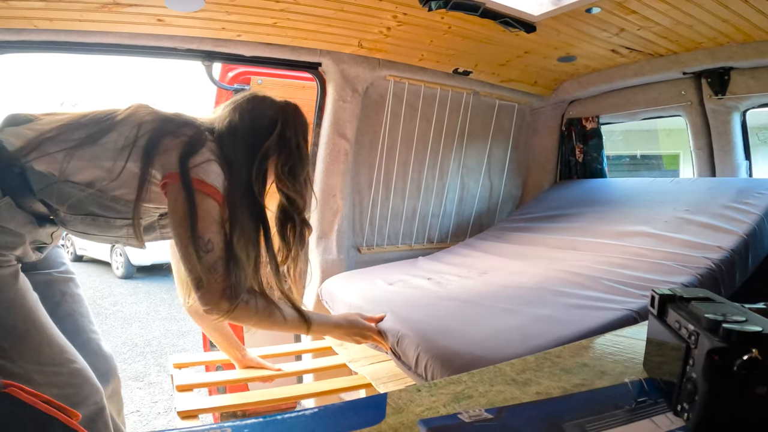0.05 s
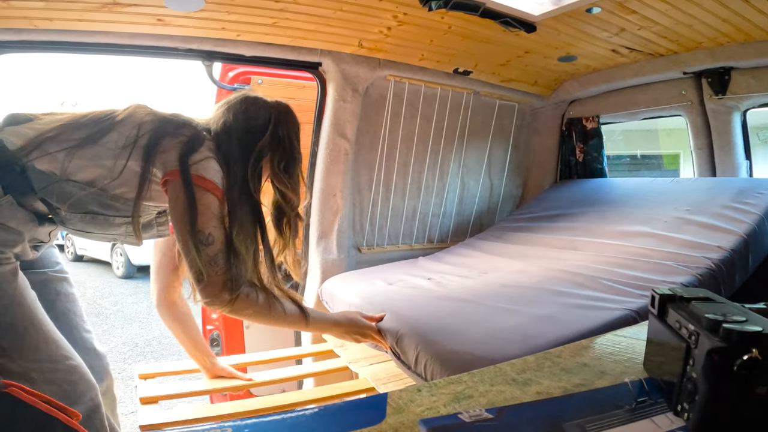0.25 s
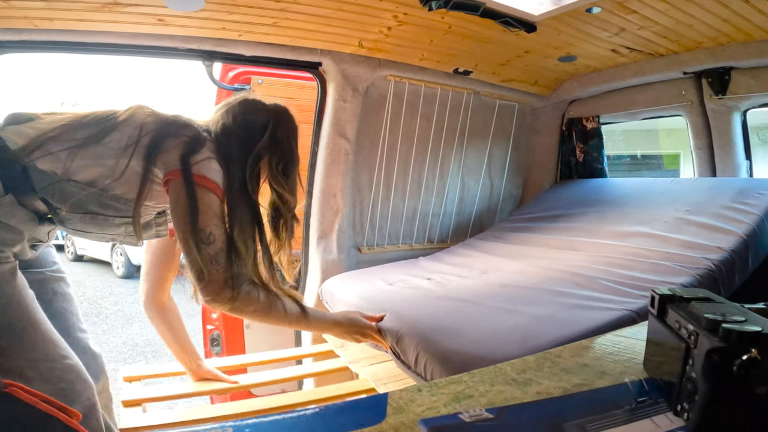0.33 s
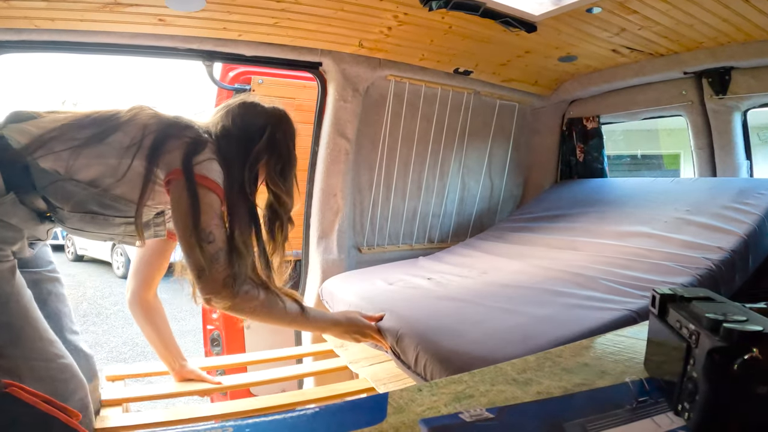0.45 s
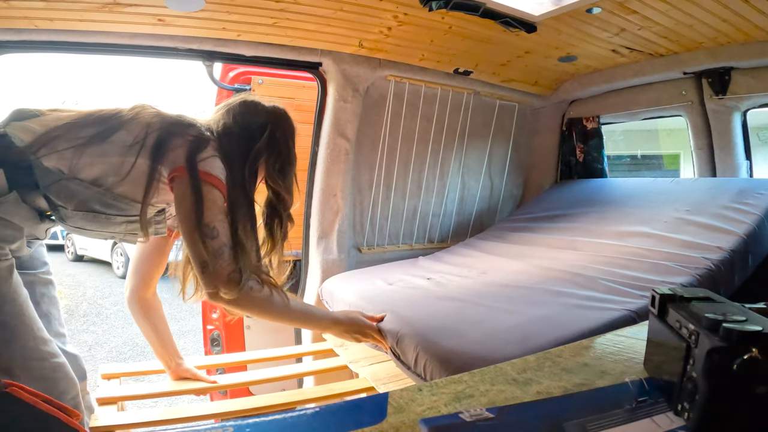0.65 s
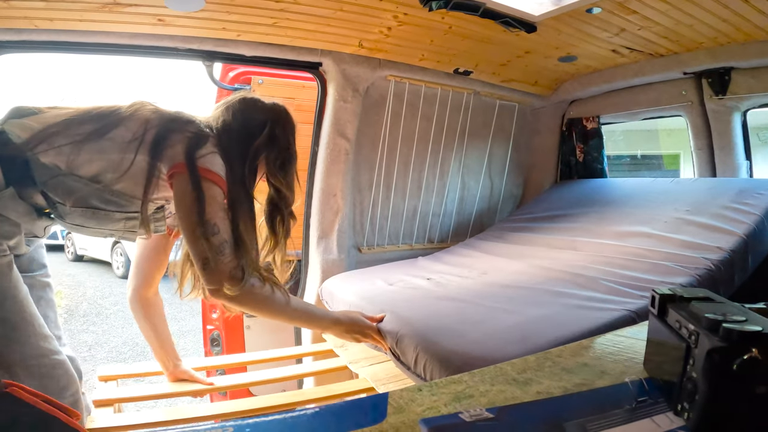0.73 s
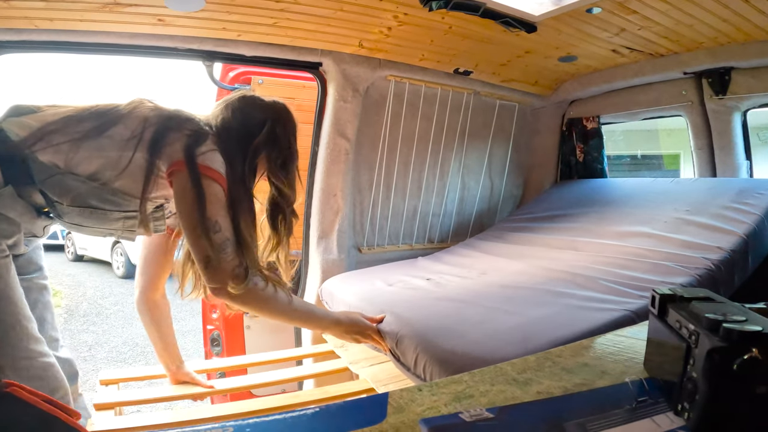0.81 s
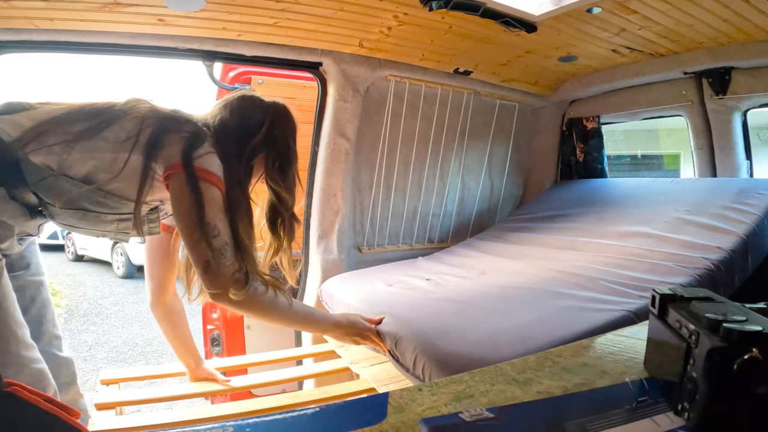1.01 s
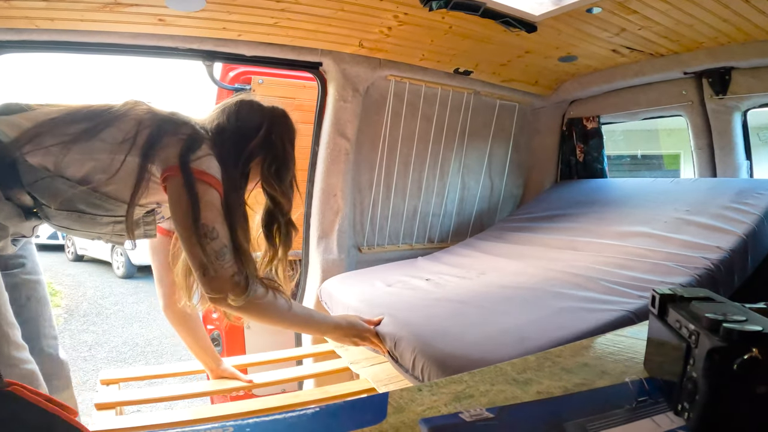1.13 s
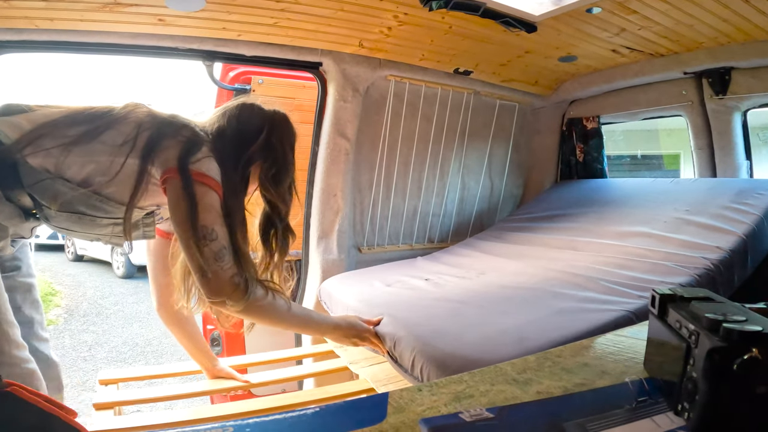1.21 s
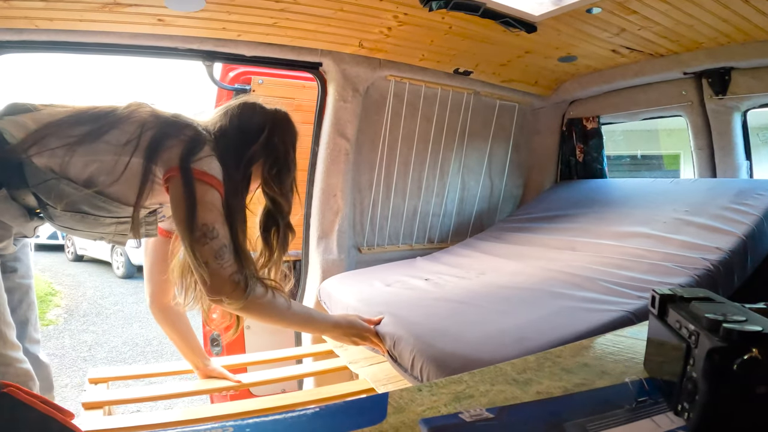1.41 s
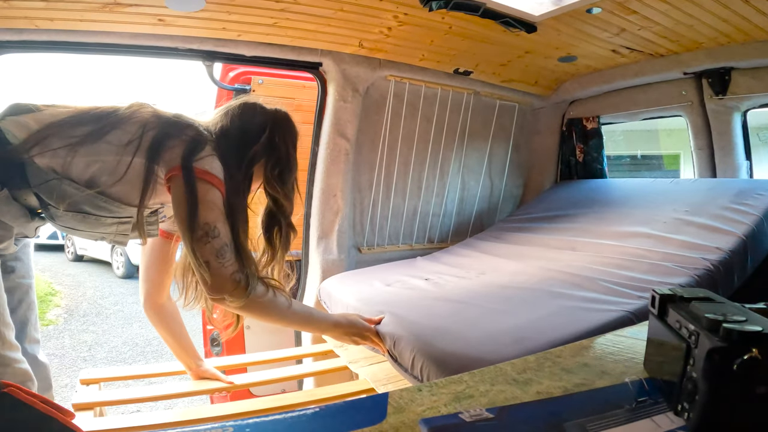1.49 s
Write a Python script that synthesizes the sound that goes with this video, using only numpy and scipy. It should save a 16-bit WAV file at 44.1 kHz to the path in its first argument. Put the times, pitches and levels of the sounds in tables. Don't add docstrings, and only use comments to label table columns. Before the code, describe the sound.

Wooden slats scrape and rumble over a frame, with a hard knock and later soft thud

```python
import sys
import numpy as np
from scipy import signal
from scipy.fft import rfft, irfft, next_fast_len
from scipy.io import wavfile
from scipy.ndimage import uniform_filter1d

SR = 44100
rng = np.random.default_rng(int(sys.argv[2]) if len(sys.argv) > 2 else 0)


def ratio(d):
    e = np.asarray(d, float) / 20
    return 10 ** e


def store_wav(level_fs):
    pcm = np.round(np.clip(np.atleast_2d(level_fs), -1, 1) * 32767)
    wavfile.write(sys.argv[1], SR, pcm.T.astype(np.int16))


N = 68355
FIBRES_PER_S = 5000


def evened(x):
    return x / np.sqrt(np.mean(x ** 2) + 1e-20)


def read(points, hz):
    f, value = np.transpose(points)
    return np.interp(np.log(hz + 1), np.log(f + 1), value)


def add(mix, s, sound):
    part = mix[round(s * SR):][:len(sound)]
    part += sound[:len(part)]


def stroke(t, rise, fall, db):
    return ratio(db - 20 * np.maximum(t - rise, 0) / fall) * np.clip(t / rise, 0, 1)


def colour(x, points, patchy_db):
    hz, _, z = signal.stft(x, SR, nperseg=512, noverlap=384)
    patches = uniform_filter1d(rng.standard_normal(z.shape), size=4, axis=0)
    patches = evened(uniform_filter1d(patches, size=10, axis=1))
    z = z * ratio(read(points, hz)[:, None] + patchy_db * patches)
    return evened(signal.istft(z, SR, nperseg=512, noverlap=384)[1][:N])


def grit(rate, spread_db):
    happens = rng.random(N) < rate / SR
    size = ratio(spread_db * np.minimum(rng.exponential(1, N), 4))
    return evened(happens * rng.choice([-1., 1.], N) * size)


def ring(modes, detune=1):
    t = np.arange(SR // 3) / SR
    out = 0
    for k, (hz, db, t60) in enumerate(modes):
        out = out + (-1) ** k * ratio(db - 60 * t / t60) * np.sin(2 * np.pi * hz * detune * t)
    return out


# [f/Hz, level/dB per Hz]
FLOOR_SPECTRUM = [(30, -36), (60, -22), (90, -1), (200, -1), (520, -18.5), (1030, -14.5), (4000, -30),
                  (14000, -51)]


def outdoor_floor():
    return ratio(-52) * colour(rng.standard_normal(N), FLOOR_SPECTRUM, patchy_db=3.0)


# [start t/s, rise t/s, fall t/s, level/dB, f/Hz]
SWAYS = [
    (.46, .11, 0.071, -50.5, 52),
    (.24, .04, .05, -47, 57),
    (1.02, .03, 0.047, -47, 60),
    (0.67, 0.023, 0.047, -44.5, 90),
]


def sway():
    out = 0
    for s, rise, fall, db, hz in SWAYS:
        t = np.arange(N) / SR - s
        wobble = 1.5 * np.sin(2 * np.pi * 6.1 * t)
        out = out + stroke(t, rise, fall, db) * np.sin(2 * np.pi * hz * t + wobble)
    return out


# [f/Hz, t60/s]
CABIN_DECAY = [(100, 0.35), (500, 0.23), (3000, 0.12), (10000, 0.11)]


def cabin(x):
    taps = np.zeros(SR // 2)
    at = np.arange(120, len(taps) - 22, 22)
    taps[at + rng.integers(0, 22, len(at))] = rng.choice([-1., 1.], len(at))
    hz, t, z = signal.stft(taps, SR, nperseg=512)
    decay = ratio(-60 * t / read(CABIN_DECAY, hz)[:, None])
    tail = signal.istft(z * decay, SR, nperseg=512)[1]
    return signal.fftconvolve(x, tail / np.linalg.norm(tail))[:N]


# [start t/s, rise t/s, fall t/s, level/dB, weight on the slats level/dB]
SCUFF_STROKES = [
    (0.709, 0.12, 0.079, -42.5, -5.5),
    (0.851, 0.032, 0.17, -53, 11),
    (1.034, 0.038, 0.095, -44.5, -11),
    (1.097, 0.02, 0.11, -39, -11),
    (1.132, 0.027, 0.046, -46.5, -30),
    (1.19, 0.051, 0.38, -60, -22),
    (1.267, 0.075, 0.29, -52.5, -9),
    (.001, 0.0025, 0.42, -52.5, -13),
]
# [f/Hz, level/dB per Hz]
CLOTH_SPECTRUM = [(400, -25), (800, -20.5), (1340, -8.5), (2000, -7.5), (2350, -5.5), (3430, -2),
                  (8000, -19), (14000, -35.5)]


def scuffs():
    env, load, t = np.zeros(N), np.zeros(N), np.arange(SR // 2) / SR
    for s, rise, fall, db, weight_db in SCUFF_STROKES:
        brush = stroke(t, rise, fall, db) * np.minimum(t / rise, 1)
        add(env, s, brush)
        add(load, s, brush * ratio(weight_db))
    fibres = grit(FIBRES_PER_S, spread_db=-10.5) + 1.05 * rng.standard_normal(N)
    return env * colour(fibres, CLOTH_SPECTRUM, patchy_db=1.0) + rumble(load)


# [start t/s, rise t/s, fall t/s, level/dB, pitch factor]
HARD_PRESSES = [
    (1.102, 0.008, 0.09, -39, 1.0),
    (1.05, .022, 0.066, -46, 1.12),
    (0.241, 0.0074, 0.09, -34, .93),
    (1.136, 0.0056, .07, -47, 1.15),
]
# [f/Hz, level/dB, t60/s]
VARNISH_MODES = [(2392, -3, .02), (2730, -4, .02), (3010, -0.5, 0.017), (3486, -1, .018),
                 (3840, -2.5, 0.013), (4100, -2.5, 0.014), (4570, -3, .015), (5150, -6, .012)]


def presses():
    out, t = np.zeros(N), np.arange(SR // 4) / SR
    grains = grit(FIBRES_PER_S, spread_db=2.8)
    for s, rise, fall, db, pitch in HARD_PRESSES:
        sing = evened(signal.fftconvolve(grains, ring(VARNISH_MODES, pitch))[:N])
        sing = sing[round(s * SR):][:len(t)]
        add(out, s, sing * stroke(t, rise, fall, db) * np.minimum(t / rise, 1))
    return out


# [t/s, level/dB, length/ms, direction of motion]
PUSHES = [(.3785, -15.5, 3.1, -1), (.383, -11.5, 4.4, -1), (0.48, -17, 3.1, -1), (.4325, -21, 4, -1),
          (0.32, -22.5, 4, -1), (.5605, -23, 4.3, 1), (.2025, -26, 3.9, -1), (.2895, -20, 3.7, -1),
          (.900, -19, 3.1, -1), (.9045, -15, 3, 1), (.9065, -17, 3, -1), (0.37, -33, 4.4, 1)]


def jolts():
    out = np.zeros(N)
    for s, db, length_ms, direction in PUSHES:
        add(out, s, direction * ratio(db) * np.hanning(round(length_ms * SR / 1000)))
    return out


# [t/s, level/dB, pitch factor]
TIP_TOUCHES = [(.633, -40, .9), (.669, -42, .95), (.899, -31, 1.002), (.4125, -25, 1.075),
               (.463, -26, 0.99), (.362, -18, 0.93), (0.48, -39.5, .55), (.60, -41.5, .58),
               (0.91, -40.5, .72), (.862, -37, .68), (1.2, -39, 0.52), (1.505, -39, .58), (.775, -41, .45),
               (.535, -35.5, .5), (1.0, -42, .62), (1.072, -40, .72), (1.104, -39, .75), (1.12, -41, .62)]
# [f/Hz, level/dB, t60/s]
TIP_MODES = [(476, 1.5, 0.022), (634, 3, 0.0234), (910, -4, 0.017), (1298, -8, 0.035)]


def ticks():
    out = np.zeros(N)
    for s, db, pitch in TIP_TOUCHES:
        add(out, s, ratio(db) * np.convolve(ring(TIP_MODES, pitch), np.hanning(30) / 15))
    return out


# t/s, level/dB, swell t/s, free t/s, damping level/dB, t60 at rest/s
FRAME_DROP = (.3385, -10, .003, .029, -16, .22)
SEAT_THUD = (.9048, -14.5, .004, .0195, -10, .2)
# [f/Hz, level/dB, t60/s]
FRAME_MODES = [(141, -3.5, 1.), (93, -24, .25), (280, -2, .5), (200, -5, .6), (560, -14, .3),
               (690, -11, .05), (1165, -17, .09), (760, -15, .05), (625, -14, .12)]
# [f/Hz, level/dB, t60/s]
SEAT_MODES = [(153, 1, .8), (95, -13, .6), (335, -3, .06), (227, -14, .19), (580, -14, .04),
              (865, -24, .04), (1250, -16, .012)]


def settle(modes, s, db, swell, free, damping_db, rest):
    t, out = np.arange(SR // 3) / SR, np.zeros(N)
    pressed = np.clip((t - free) / .005, 0, 1)
    held_db = damping_db * pressed - 60 * np.maximum(t - free, 0) / rest
    add(out, s, ring(modes) * (1 - np.exp(-t / swell)) * ratio(db + held_db))
    return out


# [t/s, level/dB, contact time/ms, share of the seat box 0-1]
BLOWS = [(.340, -23, 0.31, 0.2), (0.348, -25, 0.55, 0.03), (0.364, -24.5, 0.62, 0.4), (0.377, -24, 1.24, 0),
         (.405, -19.5, 1.08, 0.62), (0.433, -28.5, 0.55, 0.3), (0.455, -35, 1.15, 0.7),
         (0.462, -27, 0.57, 0.2), (0.482, -45, 0.79, 0.3), (.563, -33, 1.67, 0.57), (0.585, -29, 3.1, 0.55),
         (.618, -30, 2.57, 0.6), (0.863, -33.5, 0.4, 0.6), (0.393, -30, 1.2, 0.04),
         (0.900, -29.5, 0.94, 0.56), (0.972, -29, 2, 0.78), (1.043, -23.5, 4.2, .9), (1.076, -36, 0.6, 0.4),
         (1.106, -35, 1.15, 0.48), (1.092, -41.5, 0.52, 0.46), (1.196, -36, 2.2, 0.4),
         (0.16, -26.5, 1.4, 0.26), (0.183, -30.5, 0.74, 0), (0.2, -25.5, 3.7, 0), (0.231, -27, 1.6, 0.24),
         (0.276, -25, 1.1, 0.13), (1.524, -35, 1.43, 0.05), (1.535, -36, 1.3, 0.46), (.871, -29, 1.56, 0.7),
         (.002, -36.5, 2.37, 0.98)]
# [f/Hz, level/dB, t60/s]
BOX_MODES = [(93.8, -12, 0.33), (149, -4, 0.078), (213.4, 6, 0.066), (358, 7, 0.037), (520, -26, 0.017)]


def knocks():
    crack_db, crack_t60 = -17.5, 0.075
    out, crack_env, t = np.zeros(N), np.zeros(N), np.arange(SR // 4) / SR
    detunes = rng.uniform(0.917, 1.075, (len(BLOWS), 2))
    for (s, db, contact_ms, share), detune in zip(BLOWS, detunes):
        body = (1 - share) * ring(SLAT_MODES, detune[0]) + share * ring(BOX_MODES, detune[1])
        phase = np.minimum(t[:600] * 1000 / (3 * contact_ms), 1)
        push = np.sin(np.pi * phase) ** 4
        add(out, s, ratio(db) * signal.fftconvolve(body, push / push.sum()))
        crack = ratio(db + crack_db - 60 * t / crack_t60) * np.minimum(t / 0.0037, 1)
        add(crack_env, s, crack * (1 - share) / contact_ms ** 2)
    return out + crack_env * colour(grit(FIBRES_PER_S, spread_db=2.5), SCRAPE_SPECTRUM, patchy_db=-2.0)


# [t/s, level/dB, fall t/s]
GRAIN_CATCHES = [(.077, -42, 0.04), (.219, -39, 0.022), (.232, -37, .015), (.242, -29, 0.032),
                 (0.258, -36, .03), (.341, -28, 0.029), (.358, -33.5, 0.024), (.285, -36, .02),
                 (0.408, -42, 0.033), (0.431, -36.5, 0.033), (0.46, -42, 0.039), (.496, -41, 0.023),
                 (0.571, -50, 0.022), (.888, -46.5, 0.021), (1.187, -52, .015), (1.475, -52, 0.024),
                 (1.521, -42, .03)]
# [f/Hz, level/dB per Hz]
SCRAPE_SPECTRUM = [(300, -29.5), (600, -2), (900, -11), (1320, -8), (3350, -12), (5500, -21), (8000, -33),
                   (14000, -39.5)]


def spurts():
    env, t = np.zeros(N), np.arange(SR // 8) / SR
    for s, db, fall in GRAIN_CATCHES:
        add(env, s, ratio(db - 20 * t / fall) * np.minimum(t / 0.0015, 1))
    return env * colour(grit(FIBRES_PER_S / 2, spread_db=2.0), SCRAPE_SPECTRUM, patchy_db=1.5)


# [f/Hz, level/dB, t60/s]
SLAT_MODES = [(90.4, -10, 0.22), (154.5, -7, 0.085), (173, -7.5, 0.14), (201.3, 0.5, 0.054),
              (276, 1, 0.072), (345.6, 0.5, 0.034), (465, 0, 0.035), (588, 1, 0.017), (684, -8.5, 0.062),
              (810, -50, .04), (1110, -30, 0.11), (1396, -11.5, 0.033), (2150, -33, .03)]


def rumble(level):
    slips_per_s, out = 600, 0
    for detune in (.94, 1.0, 1.07):
        body = np.convolve(ring(SLAT_MODES, detune), np.hanning(36))
        slips = grit(slips_per_s / 3, spread_db=2.4) * level
        out = out + signal.fftconvolve(slips, body / np.linalg.norm(body))[:N]
    return ratio(-0.5) * out


# [t/s, sliding level/dB, weight on the frame level/dB]
DRAG_COURSE = [(0.062, -51, -24), (0.083, -40.5, -4), (.13, -39.5, -1), (0.189, -37, 2), (0.212, -38, -9),
               (0.248, -31.5, 0.5), (.30, -34, -8.5), (0.339, -34, 4), (.40, -36.5, 2.5), (0.431, -35, -2),
               (0.469, -39.5, 6.5), (.51, -40.5, -5.5), (0.578, -47, -3.5), (.62, -69, 11.5),
               (0.73, -55, -2), (1.40, -56, -23), (1.472, -47, -6.5), (1.55, -42.5, 2.5)]


def drag():
    s, level_db, weight_db = np.transpose(DRAG_COURSE)
    t = np.arange(N) / SR
    slide = ratio(np.interp(t, s, level_db))
    fibres = grit(FIBRES_PER_S, spread_db=3.0) + 0.99 * rng.standard_normal(N)
    scrape = colour(fibres, SCRAPE_SPECTRUM, patchy_db=2.5)
    return slide * scrape + rumble(slide * ratio(np.interp(t, s, weight_db)))


def scene():
    wood = drag() + knocks() + ticks() + jolts() + scuffs()
    wood = wood + settle(FRAME_MODES, *FRAME_DROP) + settle(SEAT_MODES, *SEAT_THUD)
    low_cut = signal.butter(4, 75, "high", fs=SR, output="sos")
    near = signal.sosfilt(low_cut, wood)
    room = ratio(-15) * cabin(near)
    return (near + room + outdoor_floor() + sway() + presses() + spurts())[None]


def low_pass(x):
    return signal.sosfilt(signal.butter(12, 13720, fs=SR, output="sos"), x)


# [f/Hz, level/dB]
PORT_RESPONSE = [(7500, 0), (8900, -8), (9100, -21), (9300, -8), (10800, 0), (12000, -2), (13500, -16.5)]


def record(dry):
    size = next_fast_len(N + 4096)
    port = ratio(read(PORT_RESPONSE, np.fft.rfftfreq(size, 1 / SR)))
    mix = irfft(rfft(dry, size) * port, size)[:, :N]
    return low_pass(mix)


dry = scene()
out = record(dry)
store_wav(out)
```